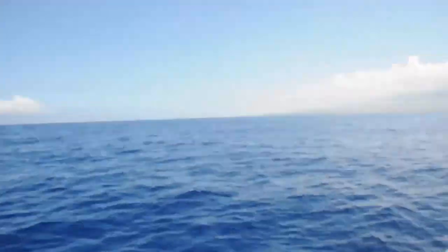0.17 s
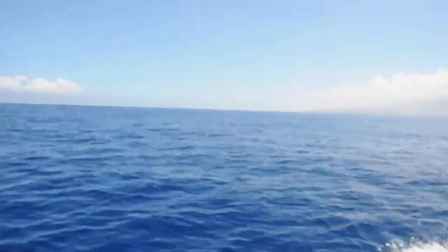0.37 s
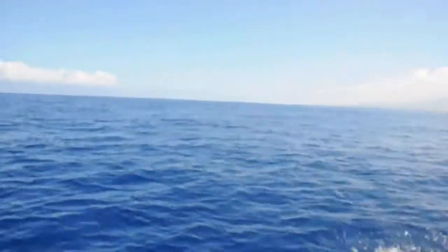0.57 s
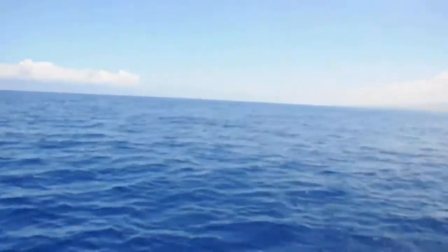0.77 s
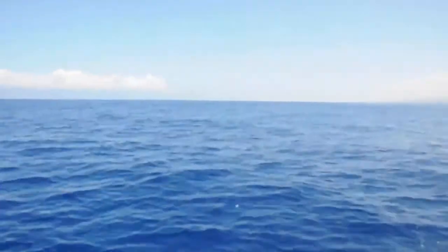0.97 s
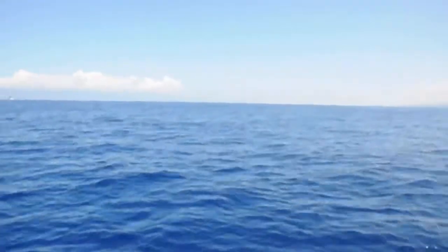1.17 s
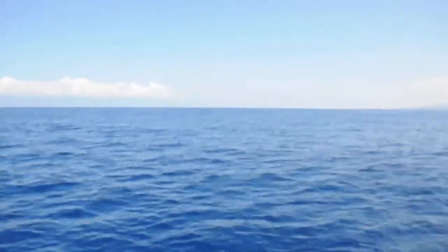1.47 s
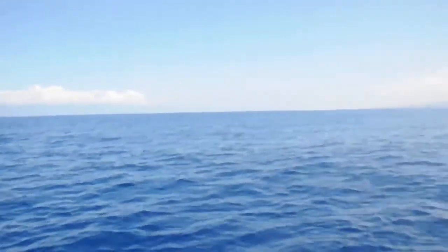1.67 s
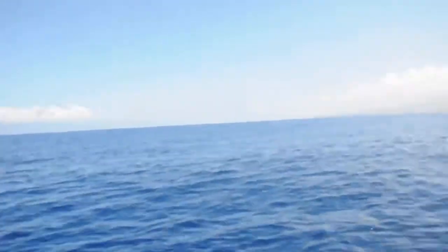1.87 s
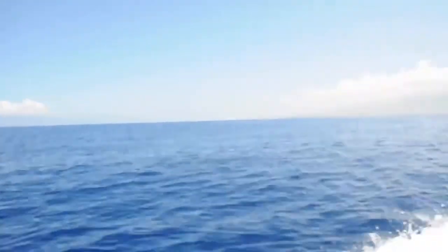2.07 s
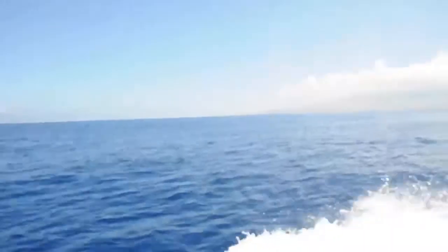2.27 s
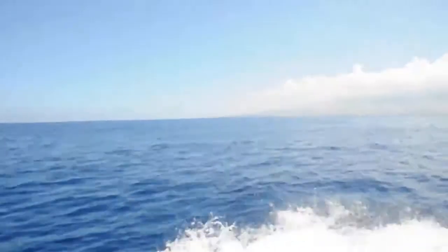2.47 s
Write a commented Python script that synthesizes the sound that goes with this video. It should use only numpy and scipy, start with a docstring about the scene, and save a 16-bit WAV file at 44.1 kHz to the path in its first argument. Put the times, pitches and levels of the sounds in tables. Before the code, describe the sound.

Continuous loud outboard motor on open sea, low-mid buzzing drone with fluttering exhaust boom, fainter rush of water and wind; muffled onboard camera microphone, with double ticks roughly every second and no echo.

```python
"""An outboard engine at steady high speed drives a small boat over open sea.
Its crank orders are sines that drone through an exhaust boom of resonated noise and a rough roar
of coloured noise puffed at each firing; wind and spray are brighter noise, over a low hum. A small
camera with a dull microphone skips twice, 22 ms apart, about once a second, each skip a tick."""
import sys
import numpy as np
from scipy import signal
from scipy.io import wavfile
from scipy.ndimage import uniform_filter1d

SR = 44100
rng = np.random.default_rng(int(sys.argv[2]) if len(sys.argv) > 2 else 0)


def magnitude_from_level(level_db):
    """Linear magnitude for a level in decibels (20 dB per decade)."""
    exponent = np.asarray(level_db, float) / 20
    return 10 ** exponent


def unload_audio(sound):
    """Save the sound as a 16-bit wav file, at the path given as the first command line argument."""
    columns = np.transpose(np.atleast_2d(sound))
    # keep every value between -1 and 1, then stretch to whole-number steps
    steps = np.round(np.clip(columns, -1, 1) * 32767)
    wavfile.write(sys.argv[1], SR, steps.astype(np.int16))


N = 115542
T = np.arange(N) / SR  # time in s

# crank orders of the drone: order (multiple of the crank cycle), relative level_db
CRANK_ORDERS = [(1, -27.5), (2, -10.5), (3, -9.5), (4, -19), (5, -5.5), (6, 4), (7, -8.5), (8, -5),
                (9, -10.5), (10, -13.5), (11, -11), (12, -13), (13, -17), (14, -11), (15, -8), (16, -18.5),
                (17, -26.5), (18, -13), (19, -25.5), (20, -17), (20.5, -16), (21, -19.5), (22, -29.5),
                (23, -32.5), (24, -22), (25, -14), (26, -15.5), (27, -36.5), (28, -18.5), (29, -23.5),
                (30, -21), (31, -33), (32, -24), (33, -19.5), (34, -19.5), (35, -24), (41, -23.5),
                (47, -27)]
# engine speed: start_s, cycle_hz
CRANK_SPEED = [(0, 42.98), (.3, 43.2), (.5, 42.9), (.8, 42.61), (1.1, 42.89), (1.5, 42.93), (1.85, 43.26),
               (2.15, 43.04), (2.4, 42.88), (2.62, 42.96)]
# engine effort: start_s, drone load_db, exhaust boom_db, cowling ring_db
ENGINE_EFFORT = [(0.0, -25.5, -36.5, -34.5), (0.05, -17, -34, -28), (0.11, -18.5, -36.5, -36),
                 (0.14, -20, -23, -36.5), (0.25, -15, -28, -23), (0.35, -19, -35, -41.5),
                 (0.38, -19.5, -23.5, -30), (0.45, -24.5, -24.5, -33), (0.48, -28.5, -21, -30.5),
                 (0.64, -15.5, -27, -26), (0.76, -23.5, -20, -28), (0.93, -23, -26, -24.5),
                 (0.99, -22.5, -19, -36.5), (1.02, -27, -13, -34.5), (1.15, -18.5, -37, -32),
                 (1.2, -23, -20, -31.5), (1.28, -29.5, -26.5, -31), (1.43, -21, -20.5, -37),
                 (1.47, -19, -33.5, -37.5), (1.5, -10, -27, -28), (1.55, -19.5, -39.5, -35.5),
                 (1.58, -23, -31, -34), (1.78, -17.5, -27, -37.5), (1.82, -17, -15, -26),
                 (1.85, -10.5, -31, -32.5), (1.87, -19, -18, -39), (1.93, -12.5, -19, -25.5),
                 (2.01, -21, -25.5, -24.5), (2.09, -14.5, -15.5, -31), (2.19, -16, -28, -38),
                 (2.29, -34.5, -34, -35), (2.33, -23.5, -12.5, -32), (2.58, -18, -32, -34.5),
                 (2.62, -23, -39.5, -35)]
# colour of the exhaust roar: pitch_hz, relative density_db
ROAR_COLOUR = [(24, -60), (40, -27.5), (76, -11.5), (161, -10.5), (200, -3.5), (258, 1.5), (296, -2),
               (339, -0.5), (407, -7), (551, -8.5), (642, -9.5), (703, -10.5), (882, -12.5), (952, -19),
               (1500, -34), (1950, -46), (3300, -120)]
# colour of the spray and wind rush: pitch_hz, relative density_db
RUSH_COLOUR = [(530, -31), (900, -7), (954, -5), (1170, -7), (1330, -7), (1460, -8.5), (1750, -9),
               (1900, -12.5), (2500, -15.5), (3560, -18.5), (4500, -25.5), (5170, -41.5), (6720, -84),
               (11400, -120)]
# strength of the spray, heard as swings about its mean: start_s, level_db
SPRAY_STRENGTH = [(0.0, -29.5), (0.04, -24.5), (0.48, -25), (0.61, -21.5), (1.46, -21.5), (1.48, -19),
                  (1.55, -26.5), (1.56, -23), (1.88, -22.5), (2.09, -25.5), (2.41, -22), (2.62, -24)]
# how much of the spray's swell reaches each pitch: pitch_hz, share
SWELL_SHARE = [(200, .1), (450, 0.28), (800, 0.88), (1500, 0.82), (3000, 0.79), (5000, 0.73)]
# low hum apart from the crank orders: pitch_hz, level_db (rms before its waver)
LOW_HUM = [(70, -43)]
# skips of the camera: start_s, jump (share of full scale)
CAMERA_SKIPS = [(.24898, .25), (.27064, -.55), (1.27063, .02), (1.29232, -.33), (2.29231, .14),
                (2.31399, -.14)]

# pitches around which orders follow the load, the boom and the cowling ring, and how far it reaches
LOAD_HZ, LOAD_OCTAVES = 258, 0.15
BOOM_HZ, BOOM_OCTAVES = 218, 0.12
COWL_HZ, COWL_OCTAVES = 648, 0.08
DRONE_DB = -0.5
WAVER_DB, WAVER_RISE_DB, WAVER_HZ = 0.13, 0.5, 13  # higher orders waver more, by the rise per octave
JITTER_RAD, DRIFT_RAD, JITTER_HZ = 0.04, 0.4, 14  # jitter grows with the order, drift does not
BOOM_DB, BOOM_WIDTH_HZ = -3.5, 25
FIRINGS = 2  # per crank cycle
ROAR_DB, ROAR_PUFF = -17, 0.18
RUSH_DB, RUSH_PUFF = -25, 0.069
LOW_CUT_HZ, CEILING, FADE_IN_S, MIC_TOP_HZ = 55.5, 1.2, 0.003, 5750
SETTLE_S, THUMP_S, THUMP_SHARE = 0.0016, 0.0054, 0.064


def evened(x):
    """Scales to rms 1."""
    return x / np.sqrt(np.mean(x ** 2) + 1e-20)


def slow(hz):
    """Slow chance wandering, rms 1: sines from 0.4 Hz up to hz, weaker as they get faster."""
    coarse = T[::256]
    sines = [np.sin(2 * np.pi * (f * coarse + rng.random())) / np.sqrt(f)
             for f in np.geomspace(0.4, hz, num=16)]
    return np.interp(T, coarse, evened(sum(sines)))


def swell(hz, t):
    """The spray's rise and fall in dB, as much of it as reaches each pitch."""
    start_s, level_db = np.transpose(SPRAY_STRENGTH)
    pitch_hz, share = np.transpose(SWELL_SHARE)
    reach = np.interp(np.log(hz + 1), np.log(pitch_hz), share)
    return np.multiply.outer(reach, np.interp(t, start_s, level_db - level_db.mean()))


def noise(colour, patchy_db):
    """Random short-time spectra of a given colour, with drifting patches and the spray's swell."""
    hz = np.fft.rfftfreq(2048, 1 / SR)
    pitch_hz, density_db = np.transpose(colour)
    real, imaginary, patches = rng.standard_normal((N // 512 + 5, 1025, 3)).T
    patches = uniform_filter1d(patches, size=16, axis=0)  # smooth over pitch
    patches = evened(uniform_filter1d(patches, size=8, axis=1))  # smooth over pitch, then time
    colour_db = np.interp(np.log(hz + 1), np.log(pitch_hz + 1), density_db)[:, None]
    frame_s = np.arange(real.shape[1]) * 512 / SR
    level = magnitude_from_level(colour_db + patchy_db * patches + swell(hz, frame_s))
    sound = signal.istft((real + 1j * imaginary) * level, nperseg=2048, noverlap=1536)[1]
    return evened(sound[:N])


def drone(angle, controls_db):
    """Each crank order is a sine; it follows the load, boom or cowling ring near it, else wavers freely."""
    centres_hz = np.array([LOAD_HZ, BOOM_HZ, COWL_HZ])
    widths = [LOAD_OCTAVES, BOOM_OCTAVES, COWL_OCTAVES]
    swing_db = controls_db - controls_db.mean(axis=1, keepdims=True)
    load_db = controls_db[0].mean()
    out = 0
    for order, db in CRANK_ORDERS:
        hz = order * CRANK_SPEED[0][1]
        shares = np.exp(-(np.log2(hz / centres_hz) / widths) ** 2)
        free_db = (WAVER_DB + WAVER_RISE_DB * np.log2(order)) * slow(WAVER_HZ) + swell(hz, T)
        level = magnitude_from_level(db + load_db + shares @ swing_db + (1 - shares.max()) * free_db)
        wander = (order * JITTER_RAD + DRIFT_RAD) * slow(JITTER_HZ)
        out = out + level * np.cos(order * angle + wander + 2 * np.pi * rng.random())
    return magnitude_from_level(DRONE_DB) * out


def boom(boom_db):
    """Turbulent gas rings the exhaust leg: noise through two equal resonances in a row."""
    b, a = signal.iirpeak(BOOM_HZ, BOOM_HZ / BOOM_WIDTH_HZ, fs=SR)
    ringing = signal.lfilter(b, a, signal.lfilter(b, a, rng.standard_normal(N)))
    return magnitude_from_level(BOOM_DB + boom_db) * evened(ringing)


def roar(puff):
    """Exhaust noise that swells a little with every firing."""
    return magnitude_from_level(ROAR_DB) * noise(ROAR_COLOUR, patchy_db=1.1) * (1 + ROAR_PUFF * puff)


def rush(puff):
    """Spray and wind: brighter noise, only faintly puffed by the firings."""
    return magnitude_from_level(RUSH_DB) * noise(RUSH_COLOUR, patchy_db=1.33) * (1 + RUSH_PUFF * puff)


def hum():
    """Low tone with a little waver in level and phase."""
    out = 0
    for hz, db in LOW_HUM:
        level = np.sqrt(2) * magnitude_from_level(db + 2.5 * slow(6))
        out = out + level * np.sin(2 * np.pi * hz * T + 0.5 * slow(2.8))
    return out


def scene():
    """Engine drone, boom and roar, rush and hum; roar, rush and free orders swell with the spray."""
    start_s, *columns = np.transpose(ENGINE_EFFORT)
    controls_db = np.array([np.interp(T, start_s, column) for column in columns])
    cycle_hz = np.interp(T, *np.transpose(CRANK_SPEED))
    angle = 2 * np.pi * np.cumsum(cycle_hz) / SR
    puff = np.cos(FIRINGS * angle)
    noises = roar(puff) + rush(puff)
    tones = drone(angle, controls_db) + boom(controls_db[1]) + hum()
    return (tones + noises)[None]


def skips():
    """At each skip the wave leans away, jumps across and settles back, over a soft low thump."""
    out = 0
    for start_s, jump in CAMERA_SKIPS:
        since_s = T - start_s
        step = 0.5 * np.sign(since_s + 1e-9) * np.exp(-abs(since_s) / SETTLE_S)
        thump = THUMP_SHARE * np.exp(-(since_s / THUMP_S) ** 2)
        out = out + jump * (step + thump)
    return out


def low_pass(x):
    """Removes everything above the highest recorded frequency."""
    return signal.sosfilt(signal.butter(12, 15830, fs=SR, output="sos"), x)


def record(dry):
    """Low cut, soft overload, short fade-in and the microphone's dull top, then the skips."""
    low_cut = signal.butter(3, LOW_CUT_HZ, "high", fs=SR, output="sos")
    x = signal.sosfilt(low_cut, dry)
    x = CEILING * np.tanh(x / CEILING)
    x = x * np.sin(np.pi / 2 * np.minimum(T / FADE_IN_S, 1)) ** 2
    dull = signal.firwin(401, MIC_TOP_HZ, window=("kaiser", 10), fs=SR)
    x = signal.oaconvolve(x, dull[None], "same")
    return low_pass(x + skips())


dry = scene()
out = record(dry)
unload_audio(out)
```